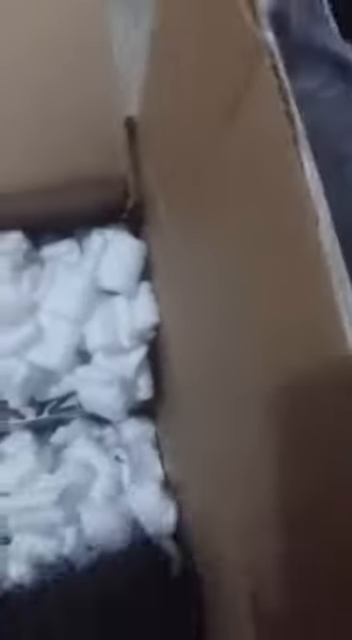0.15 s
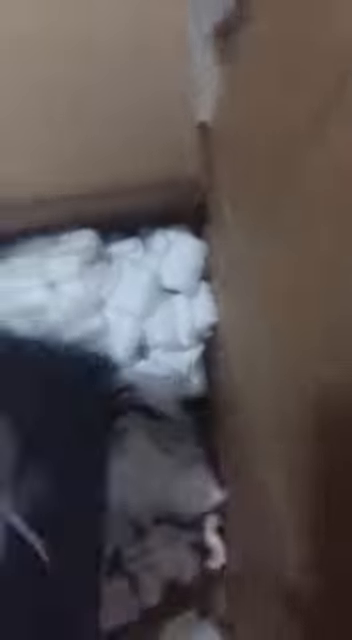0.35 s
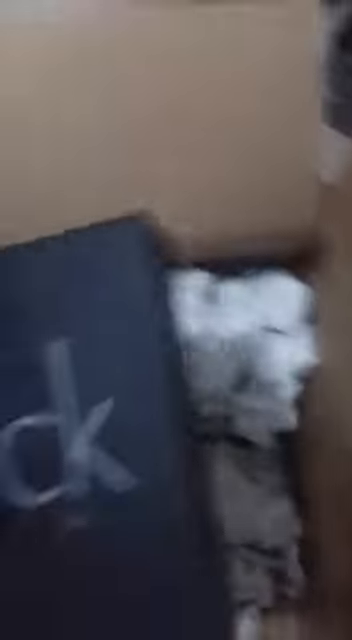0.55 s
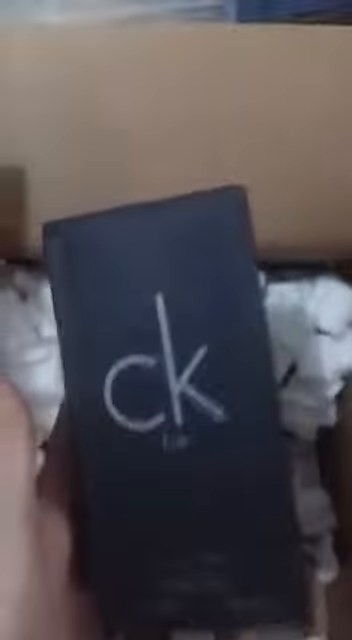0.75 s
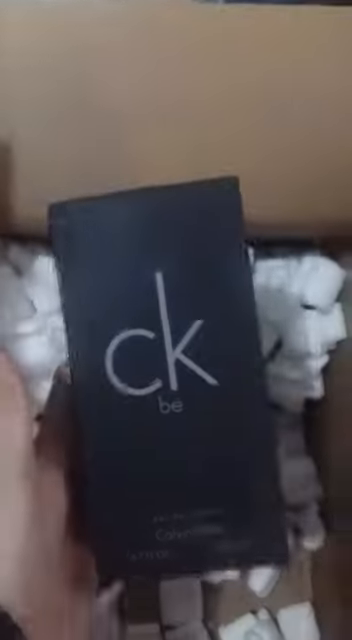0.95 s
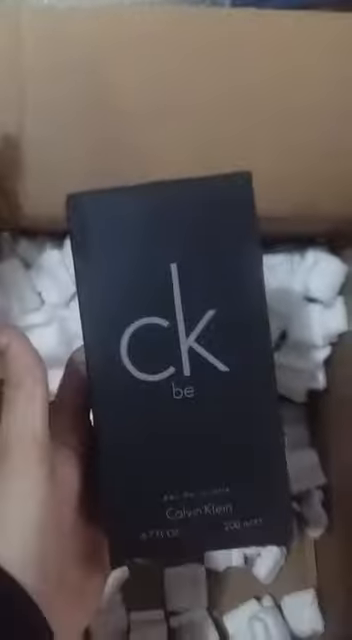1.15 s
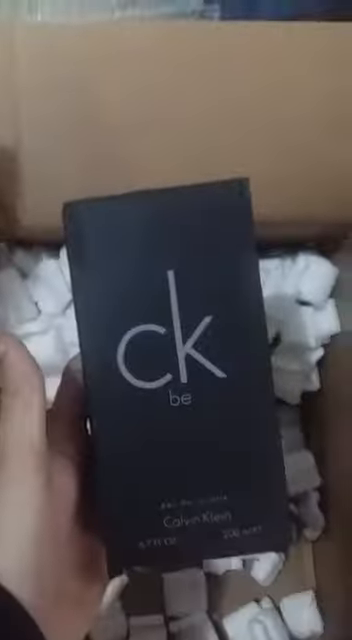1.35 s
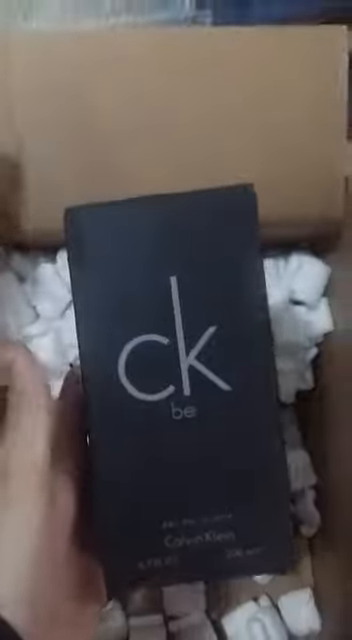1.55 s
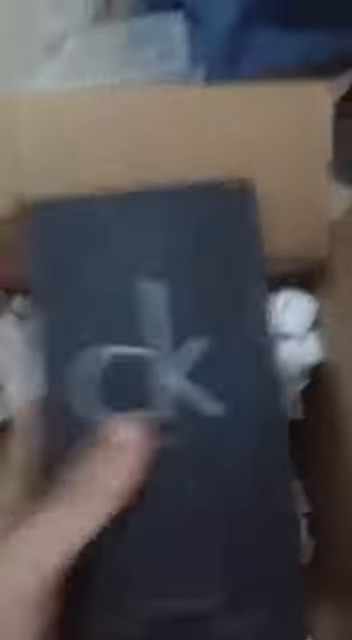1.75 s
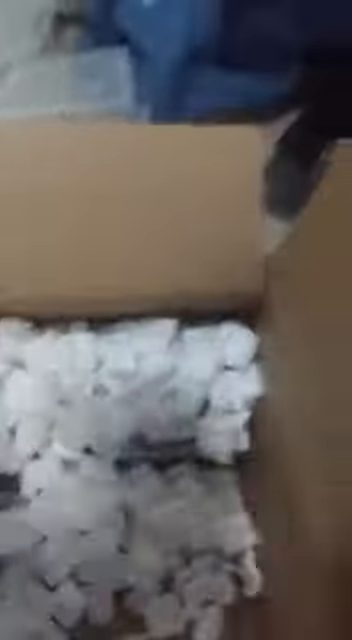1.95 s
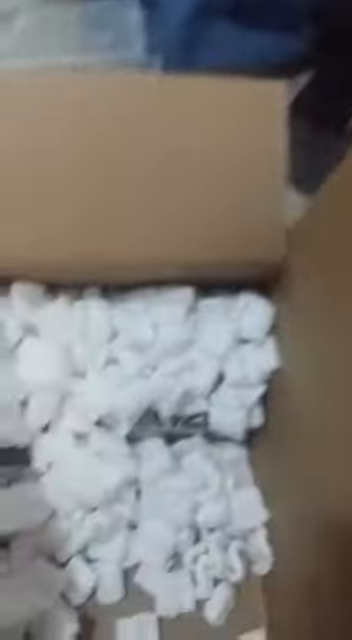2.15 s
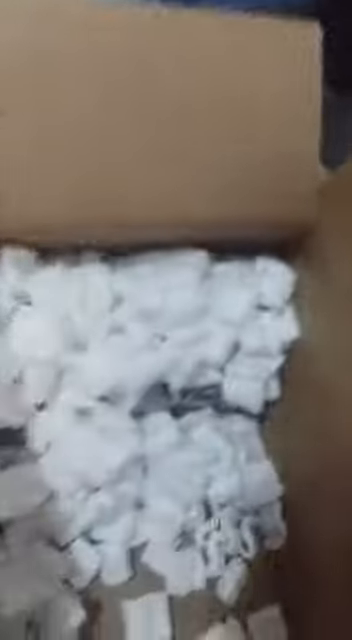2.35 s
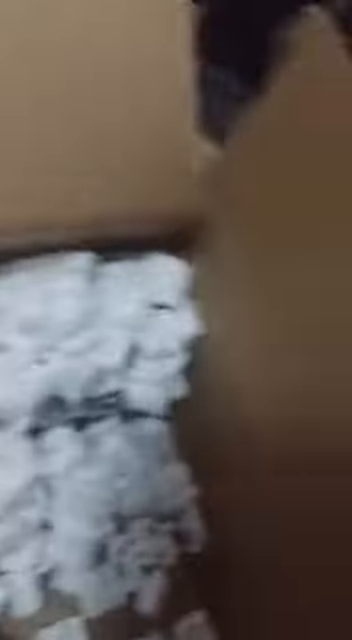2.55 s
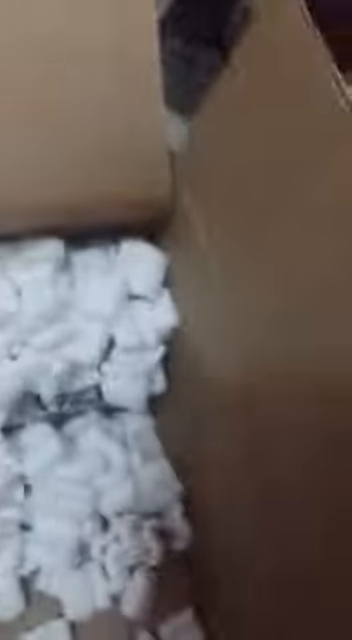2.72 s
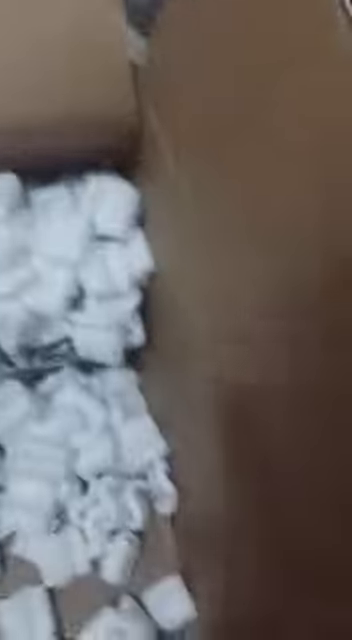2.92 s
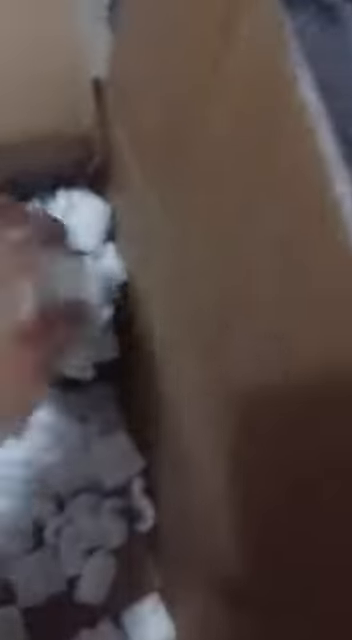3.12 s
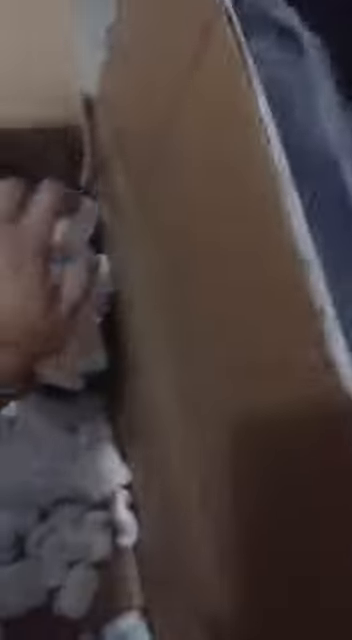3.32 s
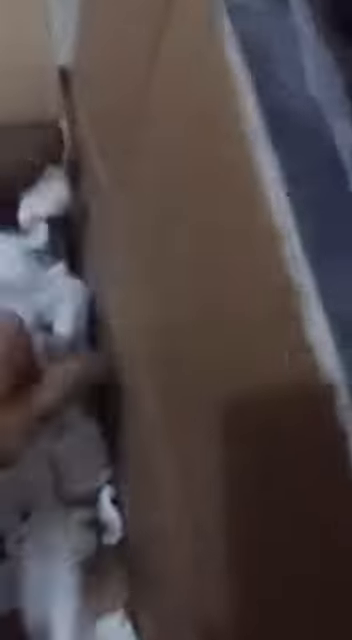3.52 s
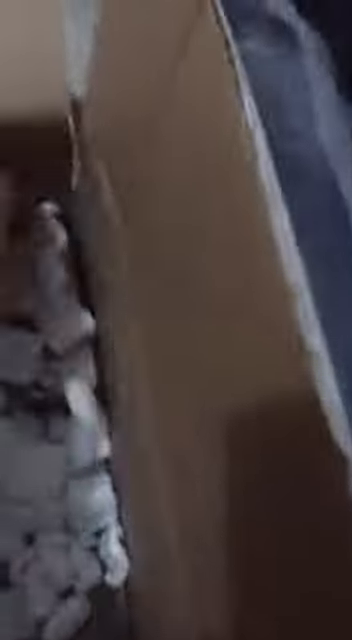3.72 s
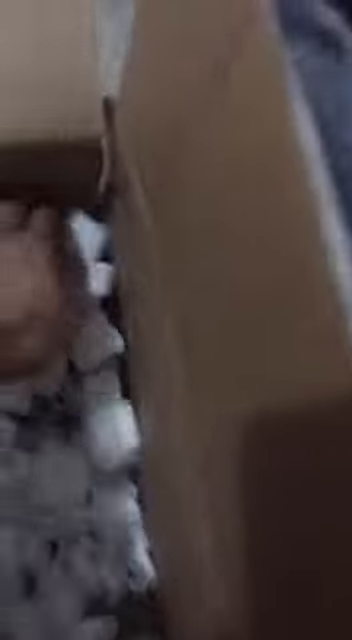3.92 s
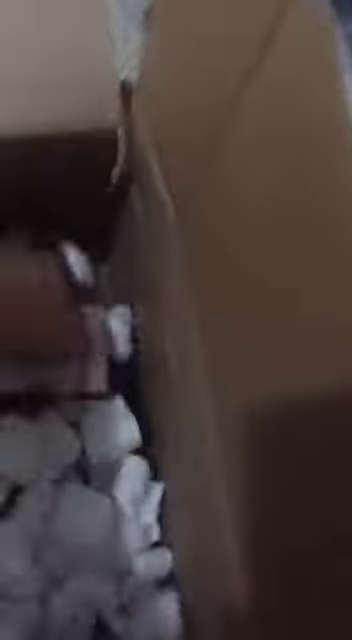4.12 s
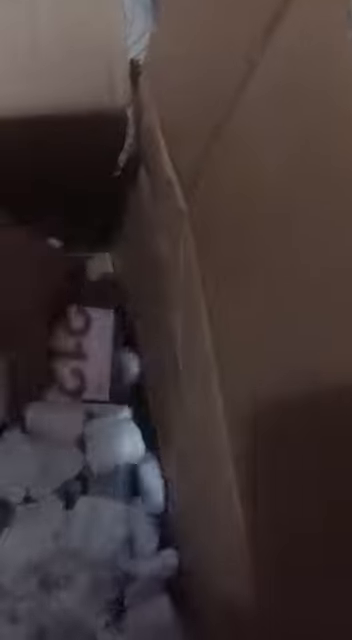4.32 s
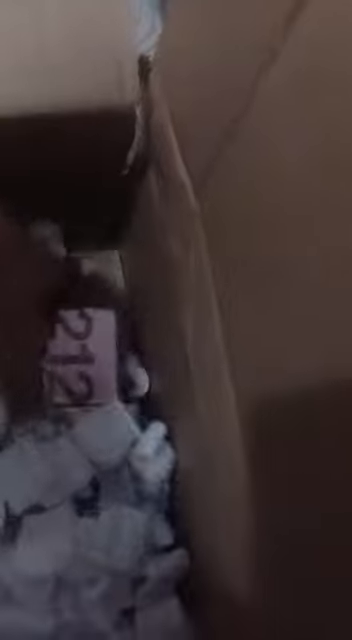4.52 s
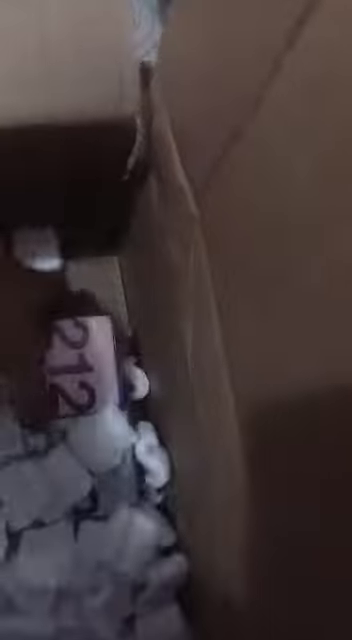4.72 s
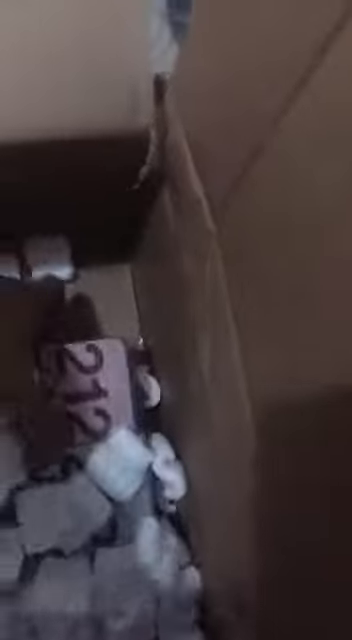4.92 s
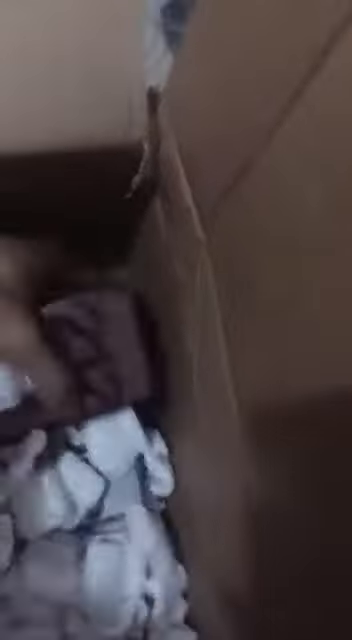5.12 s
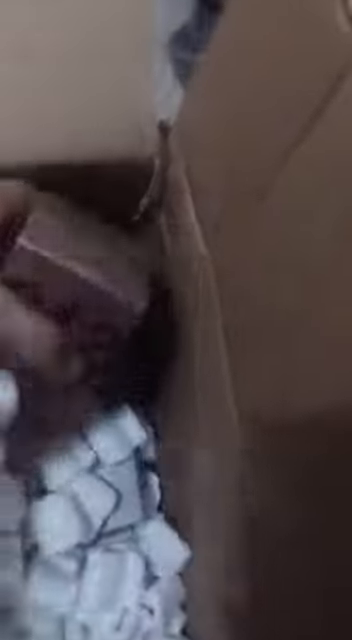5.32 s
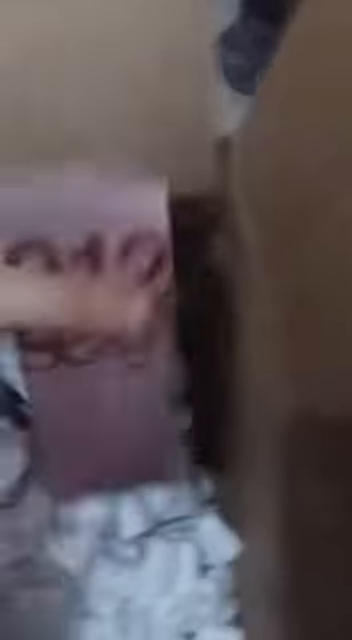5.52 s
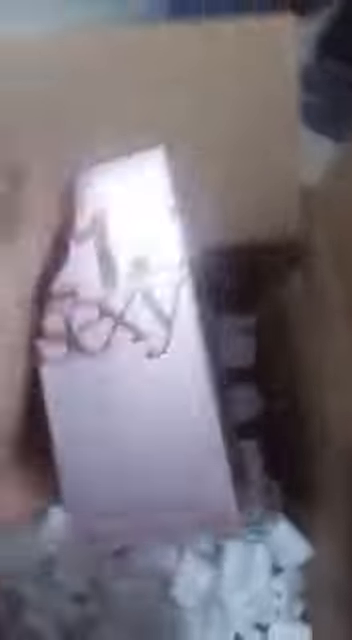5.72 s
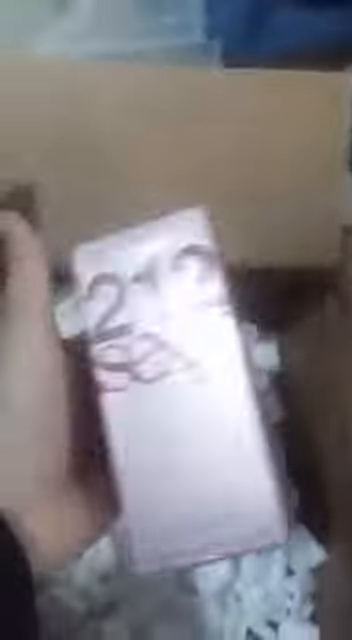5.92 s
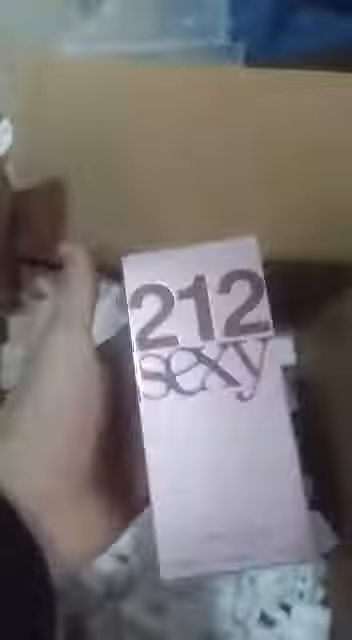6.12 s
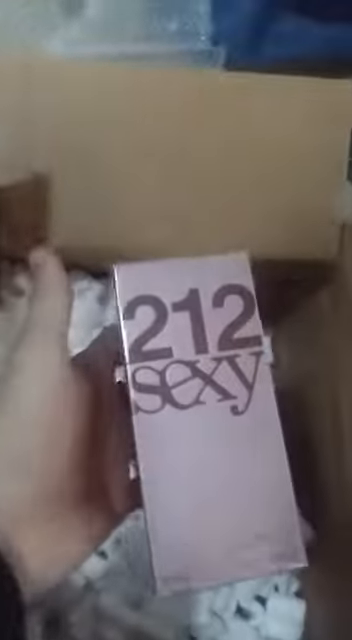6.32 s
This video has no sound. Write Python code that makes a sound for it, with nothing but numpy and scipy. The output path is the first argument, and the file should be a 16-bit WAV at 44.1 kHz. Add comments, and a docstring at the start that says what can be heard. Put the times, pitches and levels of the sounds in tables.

```python
"""A hand digs in a cardboard box of foam packing pieces, lifts out a small carton and, after a quiet spell,
sets it down with hollow tocks; then it digs harder for a second one and comes to rest.
Foam and wall friction are clumps of tiny ringing slips, squeaks are gliding chirps,
taps, tocks and knocks are short dying vibrations. A small furnished room adds echoes and a soft hush."""
import sys
import numpy as np
from scipy import signal
from scipy.io import wavfile
from scipy.ndimage import uniform_filter1d

SR = 44100
rng = np.random.default_rng(int(sys.argv[2]) if len(sys.argv) > 2 else 0)


def generate_wav(signal):
    """Clip the signal to [-1, 1] and save it as 16-bit WAV at the path in sys.argv[1]."""
    frames = np.transpose(np.atleast_2d(signal))
    scaled = np.clip(frames, -1, 1) * 32767
    pcm = np.round(scaled).astype(np.int16)
    wavfile.write(sys.argv[1], SR, pcm)


N = 280917

# Levels in the tables and settings are those before the mix in scene(); t60 is the time to fall by 60 dB.
# Colour of foam crackle: f/Hz, level per Hz/dB
FOAM_COLOUR = [(700, -11), (1100, -8.5), (1800, 1.5), (2500, -2), (3090, 1), (3880, 1.5), (5340, -4),
               (7500, -12), (10800, -21), (15000, -24), (16000, -45.5)]
# Colour of scraping along the walls: f/Hz, level per Hz/dB
SCRAPE_COLOUR = [(310, 8.5), (520, 4.5), (795, -2), (1210, 0), (1450, -4.5), (1860, -5.5), (2080, -3.5),
                 (2600, -7.5), (3380, -20), (5720, -120)]
# Colour of the jostled box: f/Hz, level per Hz/dB
JOSTLE_COLOUR = [(15, -19.5), (25, -44), (48, 0), (97, 2.5), (194, 1), (227, 2.5), (297, 0.5), (348, 2.5),
                 (425, -1.5), (600, -51.5), (780, -61.5), (1320, -120)]
# How hard the hand keeps stirring between pushes: t/s, effort/dB
STIRRING = [(0, -37), (0.14, -57), (0.24, -52.5), (0.62, -49), (0.67, -60), (0.8, -67.5), (1.2, -83),
            (1.58, -83), (1.66, -62), (1.87, -62.5), (2.11, -68.5), (2.35, -66.5), (2.6, -63.5),
            (3.302, -68.5), (3.33, -54), (3.42, -50), (3.5, -45.5), (3.88, -42.5), (3.98, -52.5),
            (4.1, -39.5), (4.5, -46), (5.1, -49.5), (5.36, -51.5), (5.85, -49.5), (6.08, -67.5),
            (6.36, -72.5)]
# Pushes through the foam: start t/s, rise/s, hold/s, effort/dB, extra wall scraping/dB
HAND_PUSHES = [(0.025, 0.019, 0.047, -37.5, 2.5), (0.155, .004, 0.025, -39, 1.5),
               (0.263, 0.005, 0.0063, -40.5, 1.5), (0.335, 0.002, 0.0065, -42, 3.5),
               (0.399, 0.034, 0.022, -46.5, 4), (1.073, 0.004, .003, -67, -1),
               (1.596, .003, 0.013, -63.5, 2), (1.634, 0.006, 0.022, -60, 0),
               (1.735, .01, 0.11, -66.5, 11.5), (2.001, 0.0035, 0.03, -62, 4.5),
               (2.124, 0.064, 0.024, -57, 10), (2.31, 0.0027, 0.11, -59.5, -1),
               (2.556, 0.0036, 0.024, -58, 9), (2.585, 0.057, 0.058, -61.5, 5),
               (2.801, 0.015, 0.016, -64.5, 9), (2.95, 0.0036, 0.012, -73, 6.5),
               (3.316, 0.0016, 0.042, -36, -1.5), (3.427, 0.0069, 0.089, -35, -4),
               (3.517, 0.016, 0.0097, -26.5, -3.5), (3.573, 0.0088, 0.024, -36.5, 3.5),
               (3.701, 0.0031, 0.054, -41.5, 2), (3.818, 0.026, 0.054, -40, 2.5),
               (3.972, 0.059, 0.046, -35, -7.5), (4.099, 0.024, 0.016, -31.5, -1.5),
               (4.184, 0.015, 0.026, -36, 0.5), (4.316, 0.081, 0.012, -39, -18),
               (4.532, 0.0067, 0.054, -39, -0.5), (4.601, 0.03, 0.024, -35, 0),
               (4.727, .012, 0.062, -44.5, -11), (4.801, 0.006, 0.047, -43, 7),
               (4.865, 0.0073, 0.03, -33.5, -10), (4.947, 0.032, 0.072, -37.5, -11),
               (5.123, 0.044, 0.04, -35.5, -4.5), (5.208, 0.021, 0.047, -40, -9),
               (5.307, 0.0024, 0.0075, -42, 0), (5.37, 0.014, 0.025, -44.5, -7),
               (5.499, 0.069, 0.033, -44.5, 1.5), (5.642, 0.02, 0.045, -46, 2),
               (5.773, 0.0027, 0.014, -52, 3)]
# One piece dragged over a neighbour or the card: t/s, length/s, level/dB, f/Hz, sharpness Q
PIECE_RUBS = [(0.022, 0.082, -38.5, 1150, 4.4), (0.044, 0.057, -38.5, 4530, 4.9),
              (0.073, 0.032, -45, 6940, 4.1), (0.309, 0.0082, -46, 6850, 2.4),
              (0.334, 0.038, -40, 1830, 13), (0.393, 0.064, -48.5, 1700, 10), (0.583, 0.018, -52, 1400, 5),
              (0.937, 0.014, -60, 2680, 2.7), (1.634, 0.057, -51.5, 1990, 1.6),
              (1.714, 0.064, -51, 500, 4.6), (1.775, 0.023, -48, 980, 4.4), (1.819, 0.071, -57, 496, 2.1),
              (2.155, 0.02, -47, 1850, 4.1), (2.228, 0.09, -54, 1090, 9.7), (2.553, 0.064, -52, 620, 1.4),
              (2.822, 0.043, -46, 900, 1.6), (2.947, 0.033, -55, 2760, 1.9), (3.048, 0.17, -64, 2900, 1.5),
              (3.314, 0.028, -39.0, 5050, 3.6), (3.319, 0.086, -41, 4250, 8),
              (3.432, 0.024, -39, 5170, 3.5), (3.473, 0.052, -36, 3800, 1.5),
              (3.529, 0.039, -41, 2920, 2.8), (3.55, 0.023, -45, 5400, 3.7), (3.58, 0.044, -35, 1930, 6.8),
              (3.595, 0.023, -32, 1180, 4.6), (3.699, 0.022, -56, 4220, 5), (3.883, 0.036, -47, 2500, 4.6),
              (4.05, 0.031, -40, 5600, 2.1), (4.102, 0.11, -39.5, 3630, 2.6),
              (4.204, 0.043, -36, 3830, 2.3), (4.391, 0.057, -45, 3850, 2.4), (4.579, 0.01, -38, 5540, 1.9),
              (4.633, 0.027, -34, 2750, 2), (4.792, 0.0083, -40, 3770, 5.7), (4.804, 0.093, -35, 464, 5.1),
              (4.885, 0.034, -33, 3850, 4.2), (4.887, 0.04, -35, 3040, 7), (4.891, .03, -39, 5200, 5),
              (4.987, 0.12, -44.5, 4770, 2.6), (5.012, 0.024, -41, 2520, 3.7),
              (5.402, 0.014, -41, 2880, 3.8), (5.595, 0.042, -39, 1240, 9.1), (5.704, 0.043, -44, 3130, 5),
              (5.873, 0.023, -62, 2880, 2.4), (5.942, 0.015, -67, 400, 3), (6.053, 0.03, -53, 540, 2.8)]
# Taps on card: t/s, level/dB, panel f/Hz, card clack/dB, foam snap/dB, crunch decay time/s
CARD_TAPS = [(0.037, -19.5, 950, -13, -4, .004), (0.048, -15, 1090, -26, 0.5, 0.0018),
             (0.082, -24, 1260, -29, 1, .004), (0.1059, -11, 700, -9, -25, 0.0047),
             (0.164, -14, 1080, -9, -14, 0.0053), (0.179, -20, 537, -3, -25, 0.0062),
             (0.207, -34, 800, -16, 4, .002), (0.254, -28, 694, -20, -12, 0.0015),
             (0.27, -21, 620, -22, -3, 0.0031), (0.292, -21.5, 570, -7, -31, .003),
             (0.339, -21, 1090, 6, 4, 0.0018), (0.352, -15, 1070, -21, -6, 0.0023),
             (0.409, -34, 1300, -8, 9, 0.0022), (0.421, -14.5, 474, -26, -25, 0.0028),
             (0.458, -22.5, 550, -3, -18, 0.0032), (0.504, -25, 800, -15, -15, .002),
             (0.523, -33, 710, -23, 5.5, 0.0047), (0.53, -42, 1300, -9, 6, 0.0022),
             (0.58, -16.5, 1340, -28, -6, 0.0065), (0.609, -13.5, 1130, -17, -8.5, 0.0073),
             (0.615, -19.5, 620, -10, -13, 0.0088), (0.645, -26, 810, -10, -5, 0.0034),
             (0.715, -23, 1060, -28, -28, 0.0023), (0.735, -30.5, 1060, -24, -24, 0.003),
             (1.077, -40, 900, -11, 1, 0.0044), (1.773, -27, 980, -4, -7, 0.0028),
             (1.787, -35, 1000, 0, -1, 0.0022), (1.944, -35, 800, -11, -16, 0.0022),
             (2.004, -27, 536, -11, -28, 0.0054), (2.052, -32, 810, -10, -7, 0.0071),
             (2.551, -20.5, 666, -9.5, -12, 0.0036), (2.674, -35, 700, -12, -8, .003),
             (2.819, -24, 845, -11, -10, 0.0036), (3.32, -33, 890, -16, 19, 0.0017),
             (3.328, -30, 1100, -4, 12, .002), (3.34, -14, 507, -23, -17.5, 0.0023),
             (3.432, -20.5, 746, -36, -12, 0.0057), (3.44, -25.5, 900, -5, 13, 0.0027),
             (3.541, -14, 507, 2, -11, 0.0064), (3.5591, -20, 540, -12, 12, 0.002),
             (3.702, -23, 1020, -2, 8.5, 0.0057), (3.728, -20.5, 600, 1, 0, 0.0036),
             (3.751, -13.5, 1050, -33, -3, 0.0045), (3.781, -21, 900, 0.5, 1, 0.008),
             (3.8028, -11.5, 935, -18, -30, 0.0012), (3.827, -25, 1200, -2, -4, 0.0022),
             (3.853, -4, 660, -8, -14.5, 0.0012), (3.879, -20, 800, -11, -8, .002),
             (3.913, -15, 550, -8, -27, 0.003), (4.064, -22, 466, -23, 2, 0.0075),
             (4.129, -14.5, 885, -15, -4, .003), (4.139, -22.5, 1020, -15, 15, 0.0018),
             (4.175, -19, 500, -13, 3, 0.0039), (4.2007, -2.5, 565, -8, 0.5, 0.0012),
             (4.287, -22, 900, -12, 2, 0.0023), (4.325, -25, 900, -12, -1, 0.0023),
             (4.363, -16, 1080, -17, -3, 0.0033), (4.415, -12.5, 510, -29, 2, 0.004),
             (4.475, -10, 460, -15, -22, 0.0022), (4.509, -22.5, 463, -18, 6, .002),
             (4.536, -12.5, 480, -23, -3, 0.0048), (4.552, -14.5, 950, -3, -4, 0.0035),
             (4.5643, -8, 720, -10, -26, 0.0013), (4.656, -22, 790, 3, -13, 0.0032),
             (4.671, -13, 483, -7, -22, 0.0033), (4.685, -13.5, 636, -21, 3.5, 0.0023),
             (4.746, -23, 790, -10, 0, 0.0086), (4.784, -20.5, 1000, 0, -12, .002),
             (4.797, -18, 588, -31, 5, 0.0057), (4.862, -19, 900, -4, 9, 0.0016),
             (4.8812, -25, 1200, 5, 19.5, .002), (4.908, -16.5, 565, -3.5, 3, 0.0046),
             (4.998, -20.5, 540, -3, 0, 0.0074), (5.023, -24, 940, -17, 1, 0.0045),
             (5.082, -31, 1300, 6, -2.5, 0.0018), (5.162, -22, 1340, -8, 6.5, 0.0029),
             (5.184, -10, 470, 1.5, -13.5, 0.006), (5.311, -12, 1050, -14, -3, 0.0037),
             (5.32, -10.5, 1540, -23, -4.5, 0.0013), (5.342, -26, 1100, -11, -7, .002),
             (5.391, -24, 700, -14, -14, .002), (5.425, -12, 535, -16, -24, 0.0024),
             (5.45, -20.5, 620, -7, -6, 0.0046), (5.475, -31, 1200, 2, 3, .002),
             (5.517, -31, 900, -1, -8, .002), (5.531, -29, 900, -10, 5, .002),
             (5.571, -18.5, 1200, 5.5, -1, 0.0037), (5.59, -9.5, 466, -22, -28, 0.0035),
             (5.613, -28, 1250, -17, -1, 0.0033), (5.625, -24, 1250, -0.5, -3, .002),
             (5.639, -27, 1010, -8, 1, 0.0026), (5.659, -23.5, 1090, -18, -22, .002),
             (5.672, -18, 620, -20, -2.5, 0.0023), (5.698, -22.5, 504, -9, -22, 0.0039),
             (5.737, -23, 525, -2, 1, 0.0028), (5.768, -24, 486, 2, 7, 0.0032),
             (5.785, -37, 1000, 5, -2, 0.0018), (5.792, -17, 665, 3.5, -3, 0.0032),
             (5.821, -24.5, 611, -2, -18, 0.0018), (5.892, -25.5, 676, -7, -2, 0.0026),
             (5.947, -42, 622, -15, 7, 0.0025), (5.98, -39, 431, -21, 10, 0.001),
             (6.002, -41, 595, -18, -1, 0.0032), (6.115, -36, 966, -6, 0, 0.0013)]
# Foam letting go: f/Hz, level/dB
SNAP_COLOUR = [(500, -32), (1800, -7.5), (3200, 3), (5400, -4.5), (7500, -15.5), (10500, -27), (16000, -49)]
# A card edge clacking: f/Hz, level/dB
CLACK_COLOUR = [(300, -47), (800, 4), (1300, 6.5), (2200, 8), (3000, -0.5), (5000, -35), (9000, -62),
                (16000, -87)]
# Dull knocks on the box: t/s, level/dB, wall f/Hz
BOX_KNOCKS = [(0.004, -25.5, 135), (0.033, -21.5, 256), (0.053, -25, 383), (0.177, -28, 322),
              (0.965, -46, 249), (1.081, -50, 262), (2.002, -33.5, 202), (2.238, -40, 262),
              (2.365, -43.5, 60), (2.553, -26.5, 204), (2.599, -38, 220), (2.822, -27.5, 276),
              (2.958, -43, 259), (3.338, -18, 210), (3.401, -22, 282), (3.435, -17.5, 203),
              (3.8025, -0.5, 252), (3.803, -18.5, 105), (3.852, -14.5, 84), (3.887, -28.5, 113),
              (4.025, -24, 280), (4.063, -13.5, 364), (4.086, -27.5, 76.4), (4.177, -14.5, 447),
              (4.415, -23, 383), (4.445, -21, 470), (4.476, -21.5, 376), (4.554, -12, 286),
              (4.565, -8.5, 372), (4.672, -18, 248), (4.694, -11, 270), (4.802, -13.5, 340),
              (4.849, -12, 390), (4.861, -19, 113), (4.999, -30, 327), (5.186, -14, 452), (5.219, -29, 77),
              (5.374, -24, 108), (5.516, -23, 384), (5.578, -27, 437), (6.002, -36.5, 287)]
# Ways the box rings, before each blow detunes them: f/Hz, level/dB, t60/s
BOX_MODES = [(70.8, -18, 0.2), (108, -13.5, 0.2), (151, -9, 0.049), (272, -21.5, 0.083),
             (431.6, -9.5, 0.088)]
# Foam sticking and slipping: t/s, level/dB, starting f/Hz, decay time/s, roughness,
# glide/(octaves per s), left-right level/dB
FOAM_SQUEAKS = [(0.222, -37, 2530, 0.0082, 0.1, 0, -3), (0.298, -30, 4970, .004, .6, 2, 5),
                (0.355, -23, 1860, 0.008, 0.7, -3, 1), (0.391, -47, 1730, 0.042, 0.4, -4.5, -2),
                (0.464, -30.5, 2560, 0.0074, 0.7, -7, 4), (0.464, -34, 3130, .004, 0.3, -11, 0),
                (0.759, -40.5, 3700, 0.0061, 0.4, -3.5, -8), (0.759, -50, 1830, 0.007, 0.5, -6, -2),
                (0.942, -59, 2650, 0.008, 2.3, -10, 0), (4.798, -24, 3900, .004, 0.66, -18, -2),
                (4.882, -21, 5020, 0.0036, 0.3, -8, 9), (4.892, -20.5, 3130, 0.008, 0.8, 0, -2),
                (4.916, -22, 3870, 0.005, 0.4, -12.5, 0), (5.23, -23, 4680, 0.0038, 0.65, -22, 3),
                (5.2425, -10.5, 5390, 0.0019, 0.3, 41.5, 8.5), (5.262, -18, 3210, 0.0069, 0.97, 2.5, -0.5),
                (5.276, -28, 3350, 0.0032, 0.5, 8.5, 3), (5.45, -30, 3310, 0.0071, 0.4, 7, -3)]
# The small carton lands, rocks and is let go: t/s, level/dB, wrapper snap/dB
CARTON_LANDINGS = [(2.176, -16.5, -16), (2.195, -33, -7), (2.2125, -27, -7), (2.235, -36.5, -16),
                   (2.262, -45, -16), (2.28, -44, -16), (2.314, -35, 3.5), (2.338, -38.5, -18),
                   (2.385, -46.5, 10.5)]
# Ways the small carton rings, before each blow varies the levels: f/Hz, level/dB, t60/s
CARTON_MODES = [(620, -6.5, 0.036), (890, -25.5, 0.48), (1090, 5.5, 0.016), (1130, -25, 0.23),
                (1260, -3.5, 0.021), (1840, -5, 0.019), (2250, 0.5, 0.018), (2620, -23, 0.014)]
# Echo of the room: f/Hz, t60/s
ROOM_DECAY = [(100, 0.46), (500, 0.13), (1500, 0.15), (5000, 0.24), (14000, 0.24)]
# Colour of the still room: f/Hz, level/dB
HUSH_COLOUR = [(15, -68), (25, -20), (127, -5.5), (236, -14.5), (270, -9), (293, -13), (439, -19.5),
               (476, -18), (1100, -23.5), (1190, -25), (1400, -21.5), (5140, -46), (16000, -44.5)]
# The two microphone ports ring differently (used above 400 Hz only): f/Hz, left-right level/dB
PORT_COLOUR = [(60, -1.5), (92, -3), (140, -3), (210, -1.5), (330, -1), (500, 0), (770, -0.5), (1170, 2),
               (1790, -0.5), (2740, -5.5), (4190, -2.5), (6410, 7), (9810, 0.5), (15000, 3.5)]

USUAL_DB = -43.5  # an ordinary effort
SETTLE_DB_PER_S = 252.5  # the pieces come to rest after a push
SCRAPE_DB, SCRAPE_GROWTH = -48, 0.83  # scraping at ordinary effort, and its dB per dB of effort
JOSTLE_DB, JOSTLE_GROWTH = -45, 0.65  # the same for the jostling of the box
# A knock shakes the contents: dB against the knock's table level, build-up, dying away
SHAKE_DB, SHAKE_RISE_S, SHAKE_DB_PER_S = -30.5, 0.036, 115
PIECE_HZ, PIECE_Q = (2700, 5200), 14  # pitch range and sharpness of a snapping piece
SNAP_DIRECT, SNAP_RING = 0.75, 1.3  # gains of its crack and its ring
BOX_DETUNE = 0.09  # hand and contents load the walls differently at every blow
HUSH_DB = -57
LOW_CUT_HZ, EDGE_HZ = 38, 15900  # lowest and highest pitch let through


def effort():
    """Stirring and pushes set three gains: foam crackle, wall scraping and box jostling."""
    foam = amp(np.interp(np.arange(N) / SR, *np.transpose(STIRRING)) - USUAL_DB) ** 2  # powers add
    wall = foam.copy()
    for start, rise_s, hold_s, db, wall_db in HAND_PUSHES:
        push = (amp(db - USUAL_DB) * swell(start, rise_s, hold_s, SETTLE_DB_PER_S)) ** 2
        foam += push
        wall += push * amp(wall_db) ** 2
    drive = np.sqrt(foam)
    shake_power = np.zeros(N)
    for s, db, hz in BOX_KNOCKS:
        shake_power += (amp(db + SHAKE_DB) * swell(s, SHAKE_RISE_S, 0, SHAKE_DB_PER_S)) ** 2
    scrape = amp(SCRAPE_DB) * drive ** SCRAPE_GROWTH * np.sqrt(wall / foam)
    jostle = np.hypot(amp(JOSTLE_DB) * drive ** JOSTLE_GROWTH, np.sqrt(shake_power))
    return amp(USUAL_DB) * drive, scrape, jostle


def friction(strength, spectrum, per_s, spread_db, clump_db, clump_s, q, steady_s, patchy_db,
             count=10, order=1):
    """Clumps of tiny slips, each ringing one small patch, as strong as the movement makes them."""
    clumps, out = amp(clump_db * drift(clump_s)), np.zeros((2, N))
    for hz in np.geomspace(spectrum[1][0], spectrum[-2][0], num=count):
        sizes = amp(spread_db * np.minimum(rng.exponential(1, N), 4)) * rng.choice([-1, 1], N)
        sizes *= amp(patchy_db * drift(0.025))  # other pieces touch, so the colour shifts
        slips = arrivals(sizes * clumps * (rng.random(N) < per_s / SR))
        for _ in range(order):  # a second pass keeps each slip close to its pitch
            slips = resonate(slips, hz, q)
        out += slips
    out = evened(colour(out, spectrum))
    width = max(round(steady_s * SR), 2)
    power = uniform_filter1d(uniform_filter1d((out ** 2).mean(0), width), width)
    out /= np.sqrt(abs(power) + 1e-4)  # the hand sets the slow level
    return evened(out) * strength


def soften(x, strength, corner_hz=5000, firm_db=-34, slope=0.1):
    """Lightly touched foam sounds duller than firmly pressed foam."""
    dull = signal.sosfiltfilt(signal.butter(4, corner_hz, fs=SR, output="sos"), x)
    return dull + (x - dull) * (strength / amp(firm_db)) ** slope


def creaks(strength, count=420, level_db=-2.5, spread_db=6, low_hz=1800, high_hz=5800):
    """Tiny chance squeaks between the pieces follow the strength of the crackle around them."""
    out = np.zeros((2, N))
    for when, pitch, size, glide in rng.random((count, 4)):
        hz = low_hz * (high_hz / low_hz) ** pitch
        chirp = squeak(hz, decay_s=0.006, rough=0.9, glide=20 * (glide - 0.5))  # octaves per s
        add(out, when * N / SR, strength[int(when * N)] * amp(level_db + spread_db * size) * chirp)
    return out


def ticks(strength, count=140, level_db=12, spread_db=5, low_hz=500, high_hz=1300):
    """Loose pieces tick against the card by chance, following the strength of the scraping."""
    out = np.zeros((2, N))
    for when, pitch, size in rng.random((count, 3)):
        hz = low_hz * (high_hz / low_hz) ** pitch
        tick = tap(hz, clack_db=-9, snap_db=-7, crunch_s=0.0035)
        add(out, when * N / SR, strength[int(when * N)] * amp(level_db + spread_db * size) * tick)
    return out


def rub(length_s, hz, q, slips_per_s=1300, spread_db=3.0, glide_octaves=0.11, rise_s=0.005, fade=0.506):
    """Uneven slips ring one piece; its pitch slides as the contact moves, and the run dies out."""
    t = np.arange(SR // 5) / SR
    sizes = amp(spread_db * np.minimum(rng.exponential(1, len(t)), 3)) * rng.choice([-1, 1], len(t))
    slips = sizes * (rng.random(len(t)) < slips_per_s / SR)
    progress = np.minimum(t / length_s, 1)
    slide = glide_octaves * rng.uniform(-0.39, 1) * (2 * progress - 1)
    turn = np.exp(2j * np.pi * np.cumsum(hz * 2 ** slide) / SR)
    smooth = signal.butter(2, hz / q / 2, fs=SR, output="sos")
    # Shift the moving pitch down to zero, smooth there, and shift it back: a sliding resonance
    ringing = (turn * signal.sosfilt(smooth, arrivals(slips) / turn)).real
    sound = ringing * np.minimum(t / rise_s, 1) * (1 - progress ** 2) ** fade
    return evened(sound) * np.sqrt(length_s / t[-1])


def tap(hz, clack_db, snap_db, crunch_s, crunch=1.3, ring_cycles=0.75, flight_s=0.001, soft_hz=4500):
    """A crack and a well-damped card panel, then a spray of smaller contacts and echoes in the box."""
    t = np.arange(3000) / SR
    spray = rng.choice([-1, 1], len(t)) * (rng.random(len(t)) < 2600 / SR) * (t > flight_s + 0.0006)
    spray = arrivals(spray * np.exp(-t / crunch_s))
    contact = crunch * np.sqrt(crunch_s / 0.0023) * spray / (np.linalg.norm(spray[0]) + 1e-9)
    direct = 1.0 * (np.arange(len(t)) == round(flight_s * SR))
    contact += arrivals(direct, count=1)  # from nearly straight ahead
    panel = np.sin(2 * np.pi * hz * t) * np.exp(-hz * t / ring_cycles)
    mid_tones = signal.butter(2, [400, soft_hz], "band", fs=SR, output="sos")
    panel = signal.sosfilt(mid_tones, panel)  # soft card gives off mainly mid tones
    snap = click(SNAP_COLOUR)  # the piece that lets go rings on at its own pitch
    snap = SNAP_DIRECT * snap + SNAP_RING * resonate(snap, rng.uniform(*PIECE_HZ), PIECE_Q)
    blow = panel - amp(clack_db) * click(CLACK_COLOUR) + amp(snap_db) * snap
    return signal.fftconvolve(contact, blow, axes=1)[:, :len(t)]


def knock(hz, push_cycles=0.7, ring_db=-1.5, port_lag_s=0.000096):
    """The wall flexes in and out, and the box rings on; the left port hears it a little later."""
    cycles = hz * np.arange(SR // 3) / SR
    push = np.sin(2 * np.pi * cycles) * np.exp(-((cycles - 3 / 4) / push_cycles) ** 2)
    push *= 1 - np.exp(-(4 * cycles) ** 2)  # soft start
    wall = push + amp(ring_db) * ring(BOX_MODES, BOX_DETUNE) * (1 - np.exp(-cycles))
    return np.array([np.interp(cycles - hz * port_lag_s, cycles, wall), wall])


def ring(modes, detune):
    """Dying vibrations, with pitches a little different at every blow."""
    t = np.arange(SR // 3) / SR
    out = np.zeros(len(t))
    for hz, db, t60 in modes:
        loaded_hz = hz * (1 + detune * rng.uniform(-0.99, 1))
        out += amp(db - 60 * t / t60) * np.sin(2 * np.pi * loaded_hz * t + rng.random())
    return out


def squeak(hz, decay_s, rough, glide, wobble=0.083, overtone_db=-23, rise_s=0.00076):
    """A quick stick-slip chirp with unsteady pitch, dying away."""
    t = np.arange(round(5 * decay_s * SR)) / SR
    jitter = evened(uniform_filter1d(rng.standard_normal((1, SR // 2)), size=25))[:, :len(t)]
    turn = 2 * np.pi * np.cumsum(hz * 2 ** (glide * t) * (1 + wobble * rough * jitter)) / SR
    turn = turn + rng.uniform(-1.95, 1, (2, 1))  # the ports hear it out of step
    tone = np.sin(turn) + amp(overtone_db) * np.sin(2 * turn)
    return tone * (1 - np.exp(-(t / rise_s) ** 2)) * np.exp(-t / decay_s)


def carton(snap_db, port_lag_s=0.00009, rise_s=0.00073, vary_db=2):
    """A stiff little carton tocks, its wrapper snaps; each corner stirs the modes differently."""
    t = np.arange(SR // 3) / SR
    at_ports = t + np.array([[port_lag_s], [-port_lag_s]])
    body = np.zeros((2, len(t)))
    for hz, db, t60 in CARTON_MODES:
        level = amp(db + vary_db * rng.uniform(-1, 1) - 60 * t / t60)
        body += level * np.sin(2 * np.pi * hz * at_ports)
    return body * (1 - np.exp(-t / rise_s)) + amp(snap_db) * click(SNAP_COLOUR, size=len(t))


def room(x, gap_s=0.008):
    """Reflections from many directions, each pitch range dying at its own rate."""
    n = SR // 2
    hits = rng.choice([-1.0, 1.0], n) * (rng.random(n) < 3000 / SR)
    echoes = arrivals(hits * (np.arange(n) > gap_s * SR))
    hz, t, z = signal.stft(echoes, SR, nperseg=256)
    tail = signal.istft(z * amp(-60 * t / read(ROOM_DECAY, hz)[:, None]), SR, nperseg=256)[1]
    return signal.fftconvolve(x, tail / np.linalg.norm(tail[0]), axes=1)[:, :N]


def hush():
    """The still room is a soft, steady, coloured noise."""
    return amp(HUSH_DB) * evened(colour(arrivals(rng.standard_normal(N)), HUSH_COLOUR))


def swell(start, rise_s, hold_s, fall_db_per_s):
    """Attack, hold and release, as a gain over the whole scene."""
    t = np.arange(N) / SR - start
    return np.clip(t / rise_s, 0, 1) * amp(-fall_db_per_s * np.clip(t - rise_s - hold_s, 0, 1))


def drift(seconds):
    """Smooth chance of spread about 1, with a new value every so many seconds."""
    knots = rng.standard_normal(N // 20)
    return np.interp(np.arange(N) / SR / seconds, np.arange(len(knots)), knots)


def arrivals(heights, count=8, shadow=0.18):
    """Each impulse has its own direction: up to count samples early and stronger at one port,
    late and weaker at the other."""
    lag = rng.integers(-count, count + 1, len(heights))
    at = np.arange(len(heights))
    ports = []
    for side in (1, -1):
        places = np.clip(at + side * lag, 0, at[-1])
        ports.append(np.bincount(places, heights * (1 - shadow * side * lag / count), len(at)))
    return np.array(ports)


def click(spectrum, size=3000):
    """One sharp pulse of peak 1 with the given colour."""
    pulse = colour(signal.unit_impulse(size)[None], spectrum)
    return pulse / abs(pulse).max()


def resonate(x, hz, q):
    """One resonance of gain 1 at its pitch."""
    return signal.lfilter(*signal.iirpeak(min(hz, SR / 3), max(q, 1), SR), x)


def colour(x, points, size=4096):
    """Filter with the given spectrum that sounds only after its input, never before."""
    hz = abs(np.fft.fftfreq(size, 1 / SR))
    log_gain = np.log(amp(np.maximum(read(points, hz), -100)))
    response = np.fft.ifft(np.exp(np.conj(signal.hilbert(log_gain)))).real
    return signal.fftconvolve(x, response[None, :size // 2], axes=1)[:, :x.shape[1]]


def read(points, hz):
    """Reads a table of (Hz, value) along a log-frequency axis."""
    f, value = np.transpose(points)
    return np.interp(np.log(hz + 1), np.log(f + 1), value)


def amp(db):
    """Decibels to gain."""
    return np.exp(np.log(10) / 20 * np.asarray(db))


def evened(x):
    """Scales a sound so that the average of its channels has rms 1."""
    return x / np.sqrt(np.mean(x.mean(0) ** 2) + 1e-20)


def add(mix, s, sound):
    """Mixes a sound in at time s."""
    part = mix[:, max(round(s * SR), 0):][:, :sound.shape[-1]]
    part += sound[..., :part.shape[1]]


def scene():
    """Rustle, ticks, rubs, taps, knocks and squeaks in the quiet room."""
    foam, scrape, jostle = effort()
    rustle = amp(-3.0) * friction(
        foam, FOAM_COLOUR, per_s=300, spread_db=1.5, clump_db=2, clump_s=0.014, q=6,
        steady_s=0.57, patchy_db=3.3, count=20, order=2)
    rustle = soften(rustle, foam) + creaks(foam) + ticks(scrape)
    rustle += amp(4.5) * friction(
        scrape, SCRAPE_COLOUR, per_s=180, spread_db=0.5, clump_db=1.5, clump_s=0.006, q=2.38,
        steady_s=0.14, patchy_db=4.0)
    rustle += amp(-1.5) * friction(
        jostle, JOSTLE_COLOUR, per_s=50, spread_db=4.0, clump_db=9.0, clump_s=0.005, q=0.88,
        steady_s=0.13, patchy_db=4.5)
    for s, length_s, db, hz, q in PIECE_RUBS:
        add(rustle, s, amp(db - 2.5) * rub(length_s, hz, q))
    taps, tocks, knocks, squeaks = np.zeros((4, 2, N))
    for s, db, *shape in CARD_TAPS:
        add(taps, s, amp(db - 5.5) * tap(*shape))
    for s, db, hz in BOX_KNOCKS:
        add(knocks, s, amp(db - 3.0) * knock(hz))
    for s, db, *shape, side_db in FOAM_SQUEAKS:
        sides = amp([[side_db / 2], [-side_db / 2]])
        add(squeaks, s, amp(db) * sides * squeak(*shape))
    for s, db, snap_db in CARTON_LANDINGS:
        add(tocks, s, amp(db) * carton(snap_db))
    to_room = amp(-6.0) * rustle + amp(-11.5) * taps + amp(-14) * tocks
    to_room += amp(-9.5) * knocks + amp(-15.0) * squeaks
    return rustle + taps + tocks + knocks + squeaks + room(to_room) + hush()


def record(dry):
    """Each port's own colour above the bass, a low cut, then the band limit."""
    ports = []
    for x, side in zip(dry, (1, -1)):
        port_colour = [(hz, side * db / 2 * (hz > 400)) for hz, db in PORT_COLOUR]
        ports.append(colour(x[None], port_colour))
    low_cut = signal.butter(3, LOW_CUT_HZ, "high", fs=SR, output="sos")
    ports = signal.sosfilt(low_cut, np.vstack(ports))
    band_limit = signal.firwin(511, EDGE_HZ, window=("kaiser", 9), fs=SR)
    return signal.oaconvolve(ports, band_limit[None], "same")


dry = scene()
out = record(dry)
generate_wav(out)
```